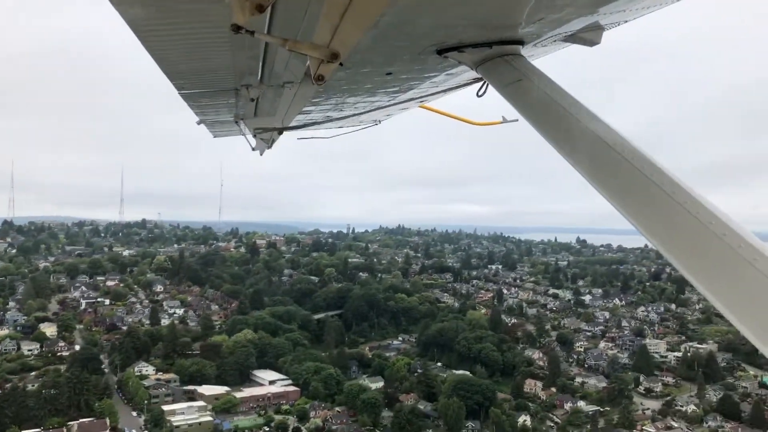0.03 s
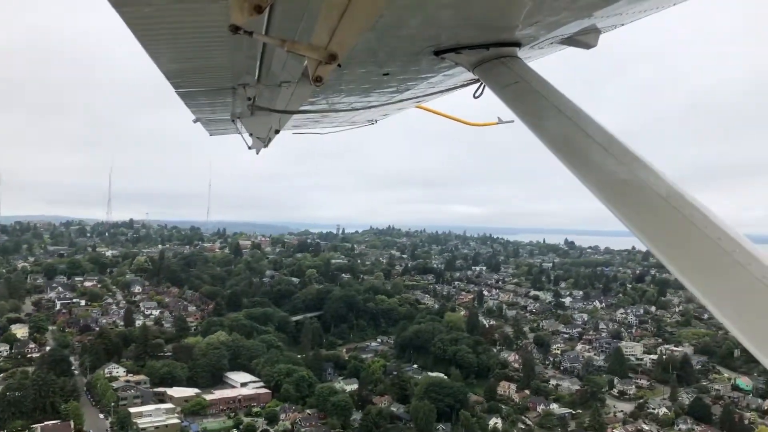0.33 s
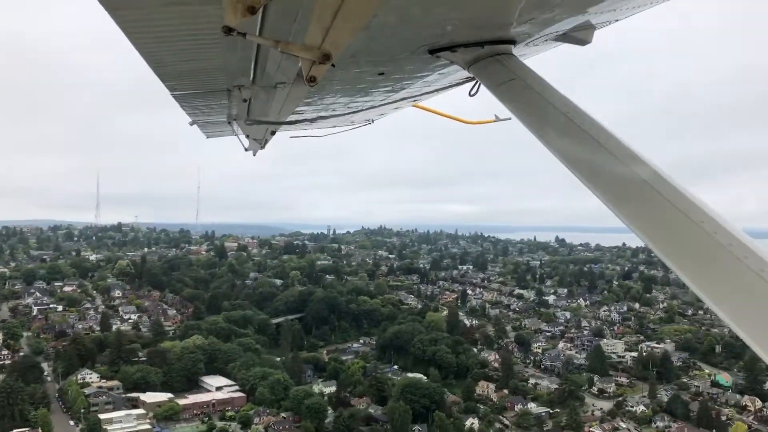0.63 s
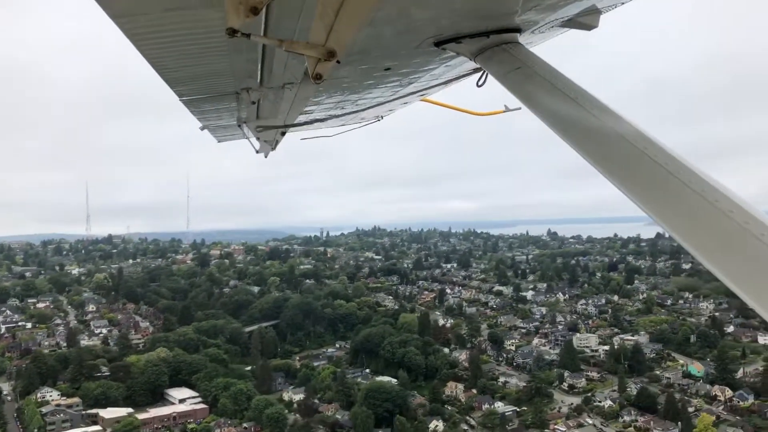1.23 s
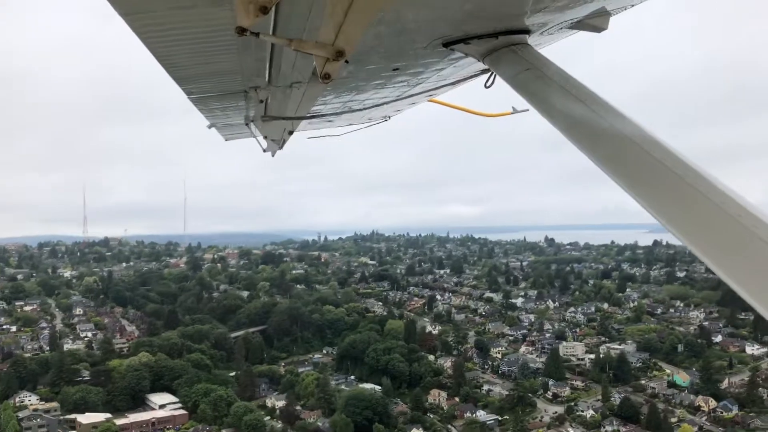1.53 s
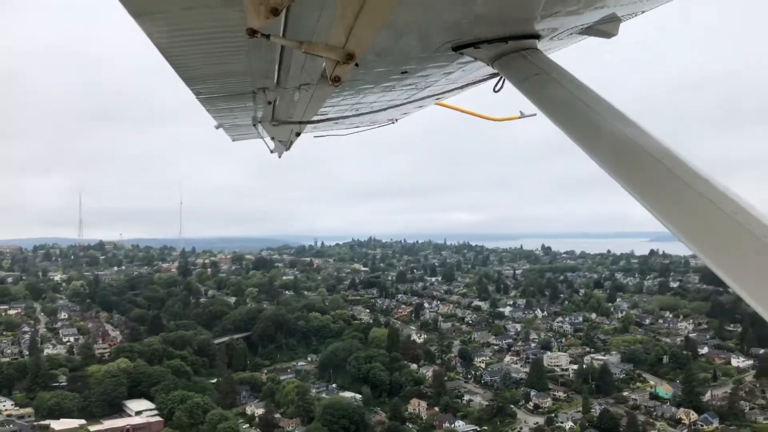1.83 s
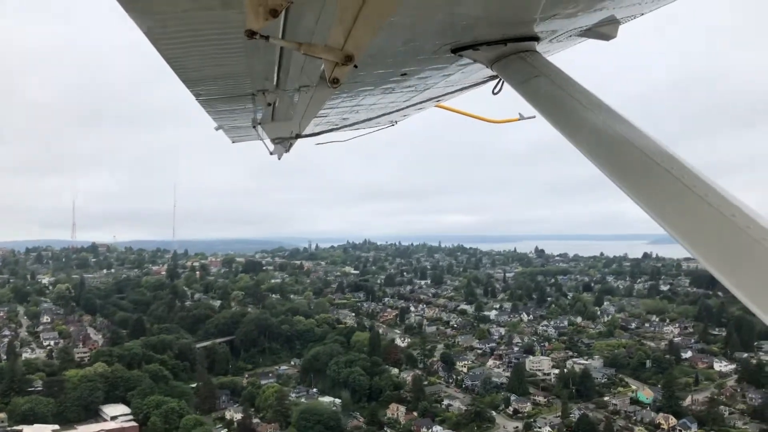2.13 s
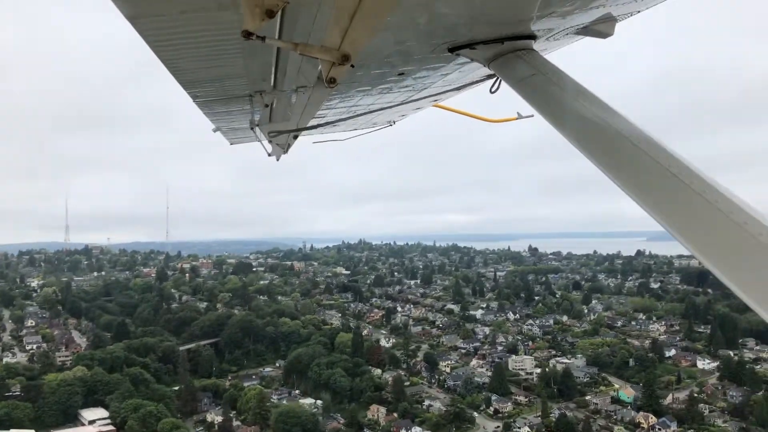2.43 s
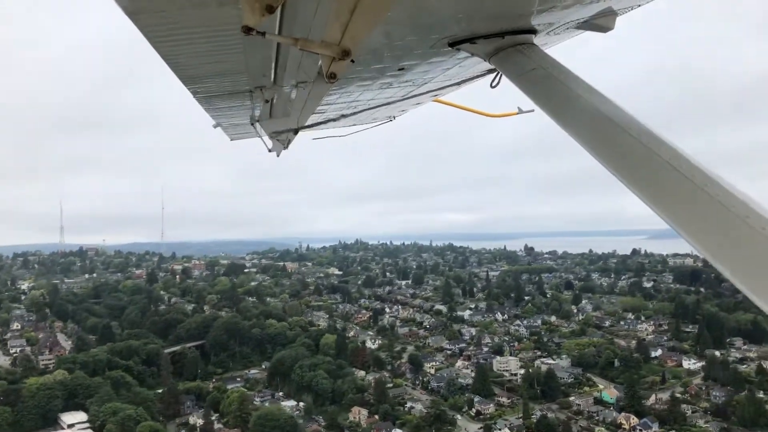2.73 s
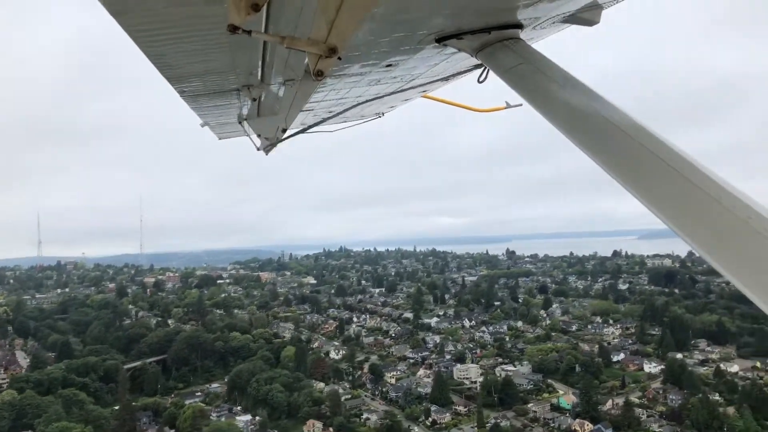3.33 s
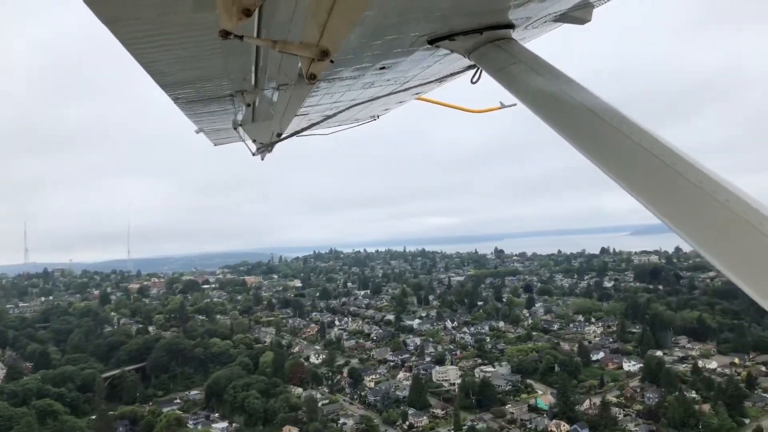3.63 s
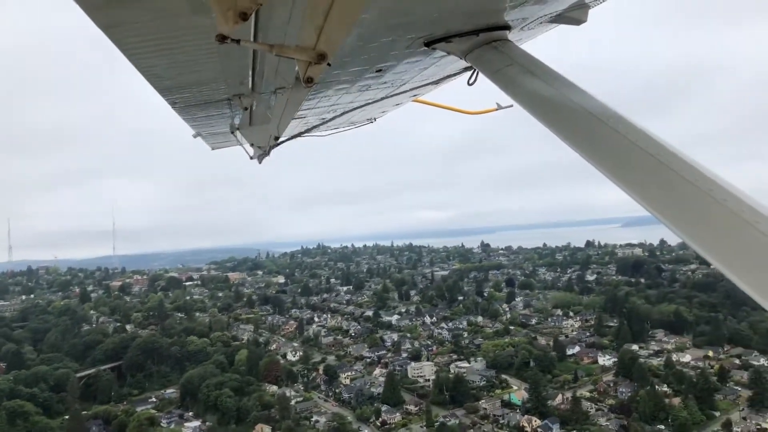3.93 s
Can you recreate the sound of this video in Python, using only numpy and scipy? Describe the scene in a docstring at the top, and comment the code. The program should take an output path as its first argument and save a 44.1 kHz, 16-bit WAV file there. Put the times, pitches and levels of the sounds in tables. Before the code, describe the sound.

A small plane's propeller drones steadily, heard from inside the rumbling cabin in flight. Air hisses along the window with a thin, fluttering whistle. Near the end the drone drops slightly in pitch and the whistle flares twice.

```python
"""Cabin of a small propeller plane in level flight.
From the start a three-blade propeller drones over weaker shaft orders, cabin rumble and slipstream hiss.
A thin, fluttering whistle, probably air through a gap in the window seal, sinks a little from 0.7 s.
A lower, breathy draught swells near 0.9 s. Near 3 s the shaft slows by about 4 % and the drone drops;
the draught swells again, and the whistle flares at 3.1 s and 3.8 s."""
import sys
import numpy as np
from scipy import signal
from scipy.fft import rfft, irfft, next_fast_len
from scipy.io import wavfile
from scipy.ndimage import uniform_filter1d, map_coordinates

SR = 44100
rng = np.random.default_rng(int(sys.argv[2]) if len(sys.argv) > 2 else 0)


def put_to_file(sound):
    """Save the sound as 16-bit audio at rate SR, in the file named by the first command-line argument."""
    columns = np.atleast_2d(sound).T  # one column per channel
    safe = np.clip(columns, -1, 1)
    whole_steps = np.round(safe * 32767)
    wavfile.write(sys.argv[1], SR, whole_steps.astype(np.int16))


N = 176400  # 4 s


def amp(db):
    """dB to gain."""
    return 10 ** (np.asarray(db) / 20)


def unit(x):
    """Scale to rms 1."""
    return x / np.sqrt(np.mean(x ** 2) + 1e-20)


def curve(rows):
    """One value per sample from (t/s, value) rows."""
    return np.interp(np.arange(N) / SR, *np.transpose(rows))


def wobble(rate_hz):
    """Smooth random curve, rms near 1, with rate_hz knots a second."""
    return map_coordinates(rng.standard_normal(N // 20), [np.arange(N) * rate_hz / SR], mode="wrap")


def phase_of(hz):
    """Running phase/rad of a frequency curve."""
    return 2 * np.pi * np.cumsum(hz) / SR


def tone(phase):
    """Sine of rms 1, random start phase."""
    return np.sqrt(2) * np.sin(phase + 2 * np.pi * rng.random())


def filtered(x, response):
    """FFT filter with gain response(f/Hz)."""
    size = next_fast_len(N + 8192)
    return irfft(rfft(x, size) * response(np.fft.rfftfreq(size, 1 / SR)), size)[:N]


def noise(spectrum, patchy_db):
    """Noise of rms 1 shaped by (f/Hz, level/dB) rows, with random gain patches in time and frequency."""
    bins = signal.stft(rng.standard_normal(N), nperseg=512)[2]
    patches = uniform_filter1d(rng.standard_normal(bins.shape), size=8, axis=0)
    patches = uniform_filter1d(patches, size=6, axis=1)
    white = signal.istft(bins * amp(patchy_db * unit(patches)), nperseg=512)[1][:N]
    knots_hz, knots_db = np.transpose(spectrum)
    return unit(filtered(white, lambda hz: amp(np.interp(np.log(hz + 1), np.log(knots_hz + 1), knots_db))))


def narrow_noise(phase, half_width_hz, edge_hz):
    """Resonant noise band of rms 1 around a running phase; steeper beyond an offset of edge_hz."""
    resonance = lambda hz: 1 / (1 + 1j * hz / half_width_hz) / (1 + 1j * hz / edge_hz)
    in_phase, quadrature = (filtered(rng.standard_normal(N), resonance) for _ in range(2))
    return unit(in_phase * np.cos(phase) + quadrature * np.sin(phase))


def slipstream():
    """Air along the window: hiss, a fine fizz above it, a breathy draught below."""
    hiss_spectrum = [(2000, -25), (6100, -12), (6750, -1.5), (7600, -0.5), (8500, -0.5), (10300, -9),
                     (12000, -14), (15600, -22)]  # f/Hz, relative level/dB
    hiss_db = [(0, -43.5), (.7, -45), (1.2, -44.2), (1.5, -45.8), (1.95, -48), (2.8, -45), (3.55, -45.5),
               (3.67, -43.2), (4, -43.2)]  # t/s, level/dB
    fizz_spectrum = [(8500, -25), (10500, -4), (11400, 0.5), (12500, -5), (14000, -8), (15600, -10.5)]  # f/Hz, relative level/dB
    fizz_db = [(0, -48), (.5, -51.5), (.68, -51.3), (.85, -50.2), (1.3, -53), (2, -52), (2.4, -52.5),
               (2.8, -50), (3.3, -52.3), (4, -53)]  # t/s, level/dB
    draught_db = [(0, -63), (.7, -57), (.88, -48.5), (1.05, -60), (2, -63), (2.6, -54), (2.95, -56),
                  (3.13, -46), (3.3, -57), (4, -56)]  # t/s, level/dB
    draught_hz = np.full(N, 2744)
    hiss = amp(curve(hiss_db) + 0.33 * wobble(20)) * noise(hiss_spectrum, patchy_db=1.5)
    fizz = amp(curve(fizz_db)) * noise(fizz_spectrum, patchy_db=1.5)
    draught = amp(curve(draught_db)) * narrow_noise(phase_of(draught_hz), half_width_hz=51, edge_hz=400)
    return hiss + fizz + draught


def whistle():
    """Probably air through a seal gap: a flickering pure core in a noise skirt on the same pitch."""
    pitch_hz = [(0, 9750), (.7, 9740), (.9, 9660), (1.3, 9560), (2, 9525), (4, 9515)]  # t/s, f/Hz
    core_db = [(0, -46), (.85, -47.5), (1.2, -42), (1.42, -40), (1.6, -47), (2.35, -42.5), (3.06, -47.5),
               (3.13, -39), (3.3, -39), (3.4, -44), (3.72, -51), (3.81, -38), (3.92, -48), (4, -47)]  # t/s, level/dB
    core_flutter_db, jitter_hz = 2.2, 10
    skirt_db, skirt_flutter_db = -42.5, 2
    phase = phase_of(curve(pitch_hz))
    flicker = unit(amp(core_flutter_db * (wobble(26) + 0.77 * wobble(130))))
    core = amp(curve(core_db)) * flicker * tone(phase + phase_of(jitter_hz * wobble(90)))
    band = narrow_noise(phase, half_width_hz=123, edge_hz=1300)
    skirt = amp(skirt_db) * unit(band * amp(skirt_flutter_db * wobble(60)))
    return core + skirt


def cabin():
    """Rumble of resonant panels shaken by the engine and the propeller wash."""
    rumble_spectrum = [(20, -45), (30, -37), (42, -18), (52, -13), (64, -9.5), (82, 0.5), (105, -2),
                       (135, -3.5), (180, -1.5), (225, -3), (290, -9), (360, -13.5), (440, -14), (560, -16),
                       (640, -19.5), (760, -22), (930, -20.5), (1200, -27.5), (1700, -37.5), (2500, -51),
                       (6000, -80)]  # f/Hz, relative level/dB
    rumble_db = [(0, -15), (.7, -16.5), (1.3, -17), (2.2, -17), (2.8, -16.5), (3.4, -17), (4, -16.5)]  # t/s, level/dB
    panel_modes = [(283, 14, 4), (320, 17, 3), (410, 12.7, 5), (502, 12, 2), (551, 30, 2.5), (689, 50, 4.5),
                   (863, 36, 3)]  # f/Hz, width/Hz, boost/dB
    panel_gain = lambda hz: amp(sum(boost_db / (1 + (2 * (hz - mode_hz) / width_hz) ** 2)
                                    for mode_hz, width_hz, boost_db in panel_modes))
    rumble = noise(rumble_spectrum, patchy_db=0.4)
    return amp(curve(rumble_db)) * unit(filtered(rumble, panel_gain))


def engine(shaft_phase):
    """Unsteady shaft orders, exhaust and airframe rush pulsing with the firings, faint machinery whines."""
    shaft_orders = [(1, -52), (2, -33), (4, -29.5), (5, -28.5)]  # multiple of shaft speed, level/dB
    rush_spectrum = [(300, -18), (1000, -5), (1900, -3.5), (2400, 0), (2850, 0), (3700, -5), (4600, -6.5),
                     (6000, -10.5), (8000, -17), (15000, -24)]  # f/Hz, relative level/dB
    rush_db = [(0, -39), (.9, -39.5), (1.3, -40.5), (2, -40.5), (2.8, -40), (4, -39.5)]  # t/s, level/dB
    whine_tones = [(6530, -63), (5970, -68)]  # f/Hz, level/dB
    flutter_db, jitter_hz = 1.1, 10
    pulse_depth, firings_per_turn = 0.092, 4.5
    hum = sum(amp(db + flutter_db * wobble(6)) * tone(order * shaft_phase) for order, db in shaft_orders)
    pulsing = 1 + pulse_depth * np.cos(firings_per_turn * shaft_phase)
    rush = amp(curve(rush_db)) * unit(pulsing * noise(rush_spectrum, patchy_db=1))
    whines = sum(amp(db) * tone(phase_of(hz + jitter_hz * wobble(60))) for hz, db in whine_tones)
    return hum + rush + whines


def propeller(shaft_phase):
    """Blade-passing tone and its octave, each swelling and fading in the cabin."""
    fundamental_db = [(0, -11.5), (.45, -16), (.7, -14), (1, -14.5), (1.55, -15.5), (1.9, -19.5),
                      (2.3, -16), (2.76, -11.5), (3.05, -19), (3.3, -17.5), (3.5, -22), (4, -18.5)]  # t/s, level/dB
    octave_db = [(0, -22), (.3, -17.5), (.8, -18.5), (1.28, -24.5), (1.6, -18), (1.83, -26), (2, -19.2),
                 (3.2, -17.5), (3.7, -19.5), (4, -16.5)]  # t/s, level/dB
    blades, flutter_db = 3, 0.35
    blade_phase = blades * shaft_phase
    fundamental = amp(curve(fundamental_db) + flutter_db * wobble(14)) * tone(blade_phase)
    octave = amp(curve(octave_db) + flutter_db * wobble(14)) * tone(2 * blade_phase)
    return fundamental + octave


def scene():
    """One shaft drives propeller and engine; cabin and air add their own layers. Mono."""
    shaft_hz = [(0, 32.92), (.6, 32.88), (.95, 32.68), (1.25, 32.65), (1.5, 32.9), (2.6, 32.94),
                (3.05, 31.73), (3.3, 31.68), (3.5, 31.53), (4, 31.7)]  # t/s, rotation rate/Hz
    relative_jitter = 0.001
    shaft_phase = phase_of(curve(shaft_hz) * (1 + relative_jitter * wobble(10)))
    return (propeller(shaft_phase) + engine(shaft_phase) + cabin() + slipstream() + whistle())[None]


def record(dry):
    """Brick-wall low-pass."""
    cutoff_hz = 15700
    return filtered(dry[0], lambda hz: hz < cutoff_hz)[None]


dry = scene()
out = record(dry)
put_to_file(out)
```